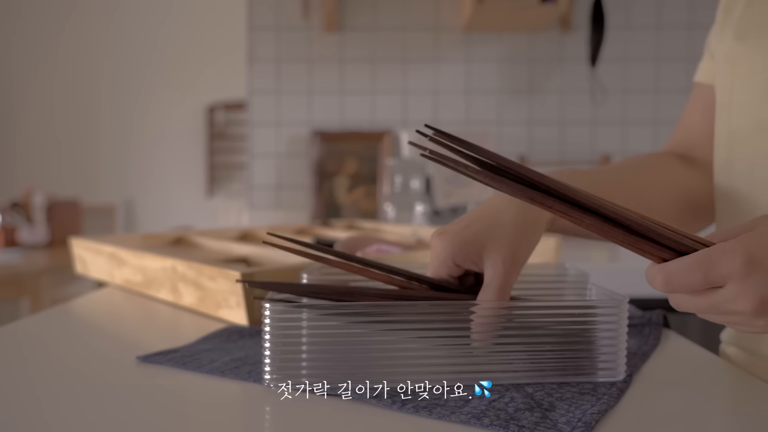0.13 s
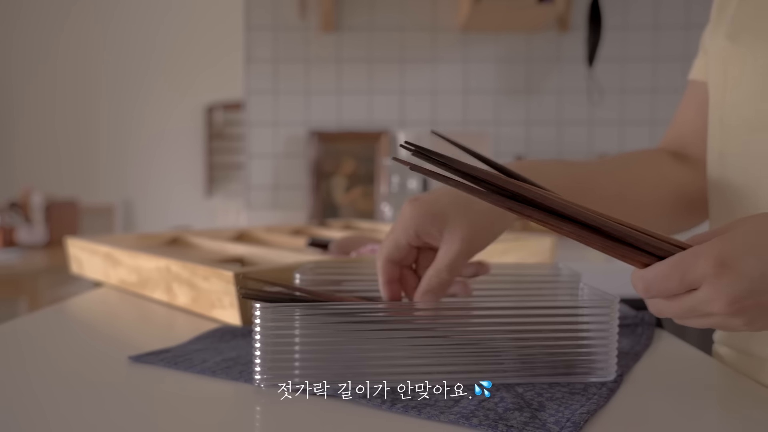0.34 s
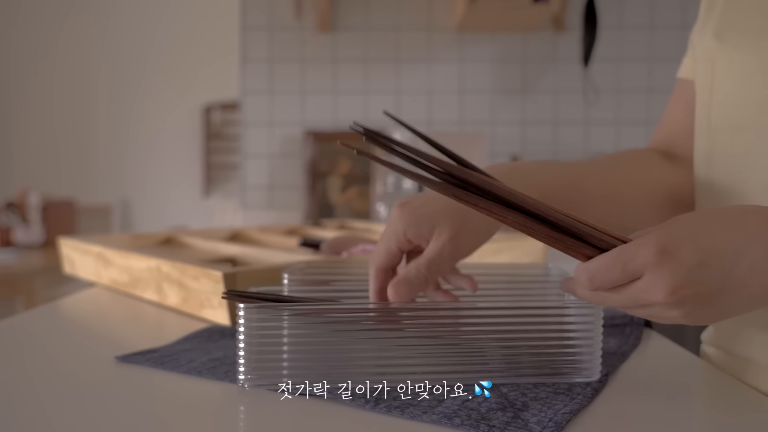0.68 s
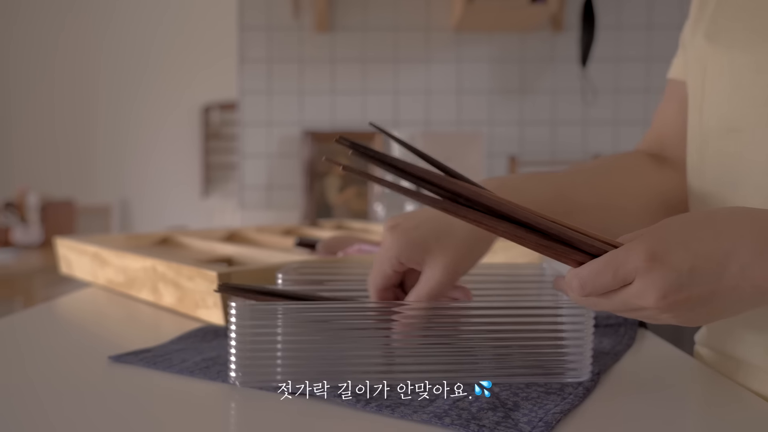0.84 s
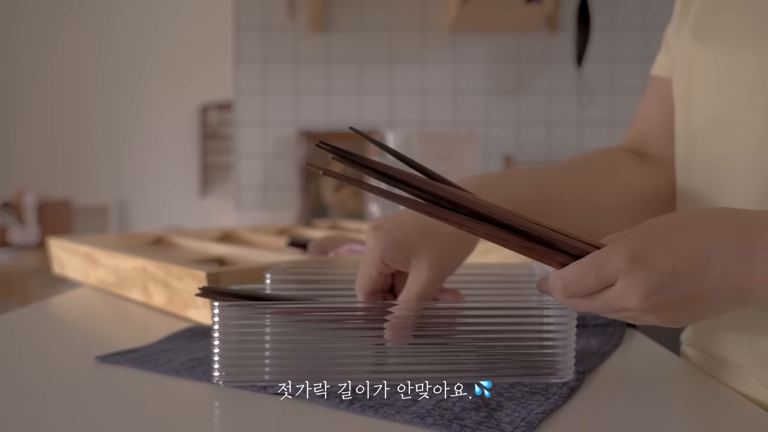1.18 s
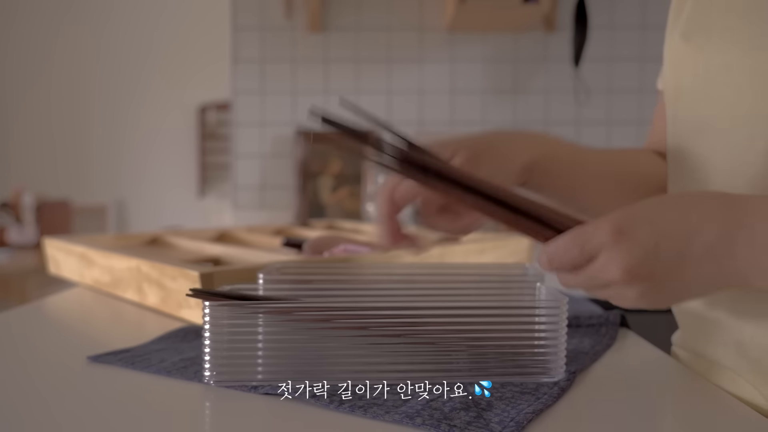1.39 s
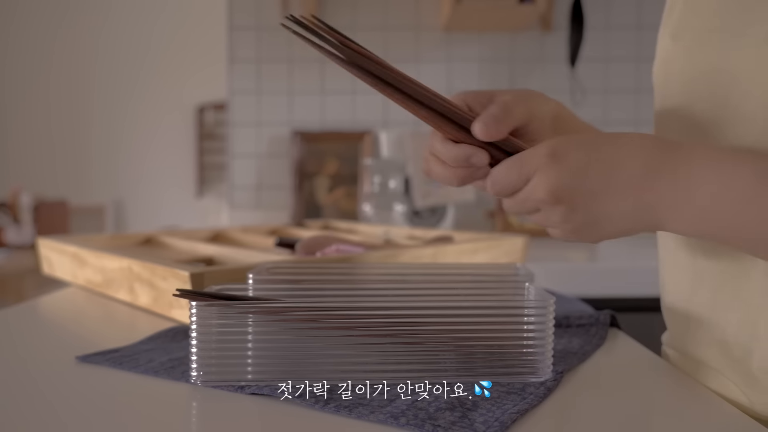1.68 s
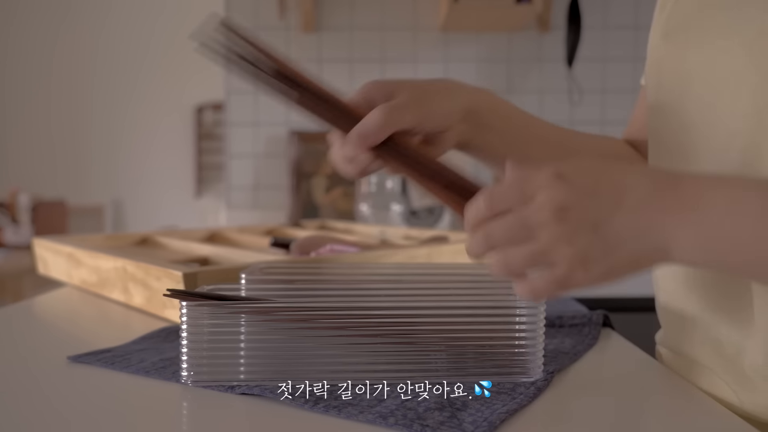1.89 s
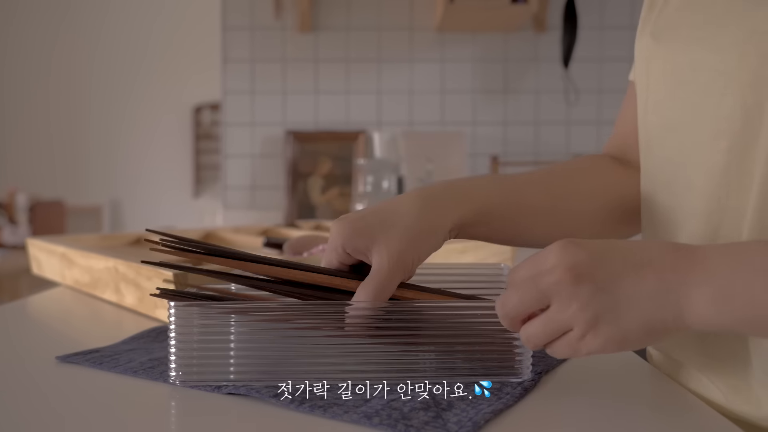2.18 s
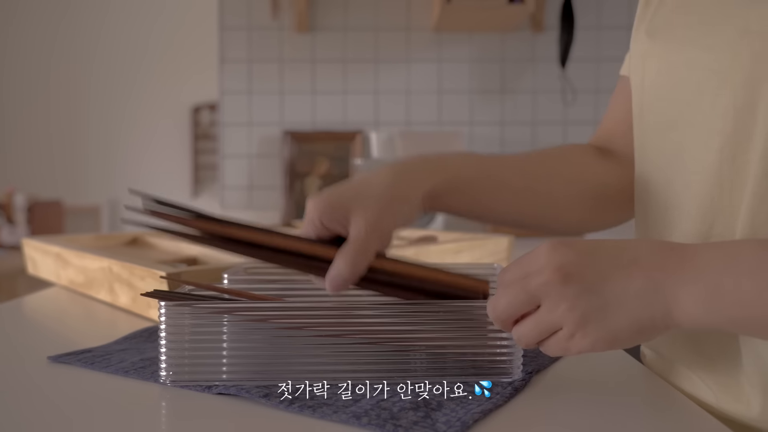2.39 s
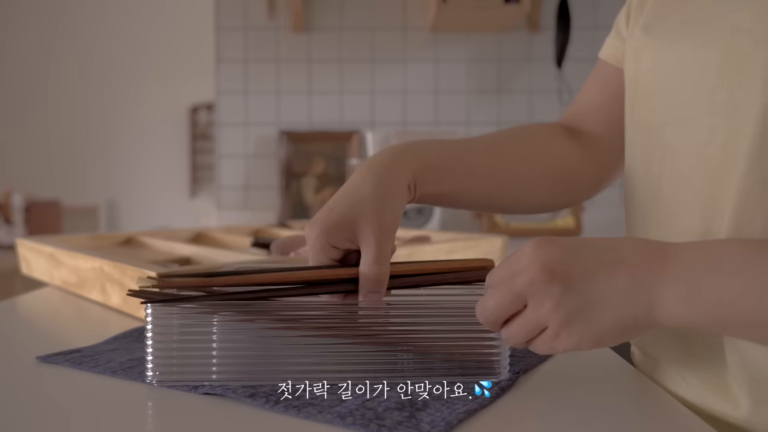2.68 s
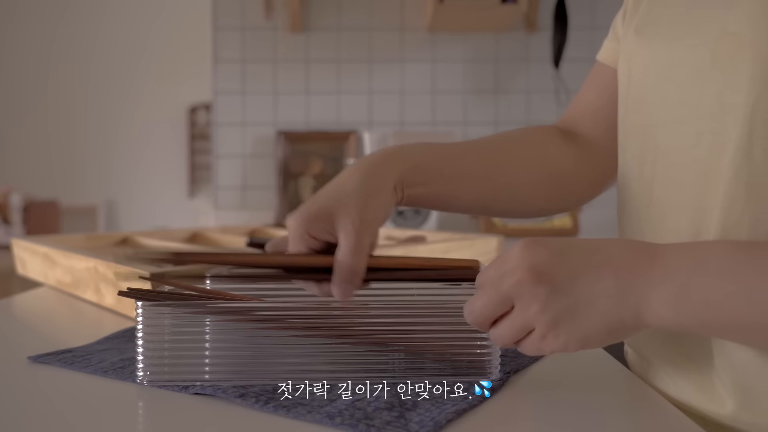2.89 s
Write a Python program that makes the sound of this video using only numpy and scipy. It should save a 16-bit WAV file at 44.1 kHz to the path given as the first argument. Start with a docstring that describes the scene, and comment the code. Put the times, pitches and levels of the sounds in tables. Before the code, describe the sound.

Close by in a quiet kitchen, wooden chopsticks rattle and knock against a plastic container. The clatter eases to a few light stick-on-stick taps, then returns in two bursts as they are laid back.

```python
"""Wooden chopsticks rattle and knock in a ribbed plastic holder, tap together in the hands and are laid back.
Each impact excites damped modes of the hollow holder and the sticks, with a sharp broadband crack;
sliding is a dense train of small impacts. The counter and the tiled kitchen reflect the sound over
a faint rumble and hum, and the loudest blows overload the recorder."""
import sys
import numpy as np
from scipy import signal
from scipy.fft import rfft, irfft, next_fast_len
from scipy.io import wavfile
from scipy.ndimage import uniform_filter1d

SR = 44100
rng = np.random.default_rng(int(sys.argv[2]) if len(sys.argv) > 2 else 0)


def materialize(psi):
    """Save the field psi as 16-bit PCM at rate SR to the path in sys.argv[1].

    A 1-D psi becomes a single channel; in a 2-D psi each row is a channel.
    """
    bounded = np.clip(np.atleast_2d(psi).T, -1, 1)
    quanta = np.round(bounded * 32767).astype(np.int16)
    wavfile.write(sys.argv[1], SR, quanta)


N = 134505
RING_S = .14  # length of one contact's sound


def amp(db):
    """Decibels to amplitude ratio."""
    return 10 ** (np.asarray(db) / 20)


def unit(x):
    """Normalisation to rms 1."""
    return x / np.sqrt(np.mean(x ** 2) + 1e-20)


def along(points, hz):
    """Interpolation on a logarithmic frequency axis."""
    freqs, values = np.transpose(points)
    return np.interp(np.log(hz + 1), np.log(freqs + 1), values)


def filtered(x, response):
    """Zero-phase filtering by a frequency response."""
    n = x.shape[-1]
    size = next_fast_len(n + 2048)
    return irfft(rfft(x, size) * response(np.fft.rfftfreq(size, 1 / SR)), size)[..., :n]


def loudest(x):
    """Greatest rms over 2.5 ms."""
    return np.sqrt(np.abs(uniform_filter1d(x ** 2, size=110, mode="constant")).max() + 1e-20)


def add(out, start_s, x):
    """Superposition of x on out."""
    i = max(0, round(start_s * SR))
    n = min(x.shape[-1], N - i)
    out[:, i:i + n] += x[:, :n]


def pair(noise, correlation):
    """Mid-side mixing of two independent signals sets the left-right correlation."""
    angle = np.arccos(np.clip(correlation, -1, 1)) / 2
    mid, side = np.cos(angle) * noise[0], np.sin(angle) * noise[1]
    return np.array([mid + side, mid - side])


def decay(t, t60):
    """Exponential damping: 60 dB in t60 seconds."""
    return np.exp(-np.log(1000) * t / t60)


def ring(modes, detune=0, scatter_db=2.5):
    """Free vibration: a sum of damped modes of random strength and sign."""
    t = np.arange(int(RING_S * SR)) / SR
    hz, db, t60 = np.transpose(modes)[:, :, None]
    pitch, level, sign = rng.standard_normal((3, len(modes), 1))
    envelope = np.sign(sign) * amp(db + scatter_db * level) * decay(t, t60)
    return np.sum(envelope * np.sin(2 * np.pi * hz * (1 + detune * pitch) * t), axis=0)


def burst(spectrum, t60):
    """A transient of exponentially decaying coloured noise."""
    t = np.arange(int(RING_S * SR)) / SR
    return filtered(rng.standard_normal(len(t)), lambda hz: amp(along(spectrum, hz))) * decay(t, t60)


def radiated(x, cutoff_hz=602):
    """Radiation efficiency: the small holder and thin sticks emit little bass."""
    return signal.sosfilt(signal.butter(2, cutoff_hz, "high", fs=SR, output="sos"), x)


# modes of the plastic holder: (frequency [Hz], level [dB], T60 [s])
HOLDER_MODES = [(912, -27.5, 0.062), (996, -18.5, 0.045), (1083, -12, 0.027), (1202.6, -8.5, 0.057),
                (1339, -16, 0.032), (1372, -19, 0.081), (1434.6, -15.5, 0.049), (1613, -21.5, 0.062),
                (1803, -16.5, 0.021), (2122, -24.5, 0.052)]


def holder(clack_hz, clack_t60=0.02, attack_s=0.00026):
    """Impact excitation: the struck wall clacks briefly and the whole box rings on."""
    t = np.arange(int(RING_S * SR)) / SR
    clack = np.sin(2 * np.pi * clack_hz * t) * decay(t, clack_t60)
    rise = 1 - np.exp(-t / attack_s)
    box = radiated((clack + ring(HOLDER_MODES)) * rise)
    return box / loudest(box)


# bending modes of one stick: (frequency [Hz], level [dB])
STICK_MODES = [(1900, -3.5), (2400, 1.5), (3400, -8.5), (4100, -0.5), (4750, -1), (5900, 8.5), (7000, 5),
               (7700, -1)]
# dry chatter of touching sticks: (frequency [Hz], level [dB])
CHATTER_SPECTRUM = [(300, -13), (2000, -7), (2900, -1), (4200, 1.5), (6500, -3.5), (15000, -40)]
# crack of a contact: (frequency [Hz], level [dB])
CRACK_SPECTRUM = [(100, -7.5), (400, -18), (1000, -34), (3000, -9.5), (7200, 12.5), (9500, 10), (13000, 2),
                  (16000, -16.5)]


def wood(struck_hz, wood_db, crack_db, t60_cycles=110, attack_s=0.0013):
    """Bending vibration with chatter and a crack; equal loss per cycle damps high modes first."""
    modes = [(hz, db, t60_cycles / hz) for hz, db in STICK_MODES]
    bending = sum(ring(modes, detune=0.0566) for stick in range(2))
    # the point of contact favours one mode, slightly different in each of seven touching sticks
    struck = ring([(struck_hz, 0, t60_cycles / struck_hz)] * 7, detune=0.0535)
    chatter = burst(CHATTER_SPECTRUM, t60=.045)
    # a short fade-in softens the start of each click
    rise = 1 - np.exp(-np.arange(len(bending)) / (SR * attack_s))
    sticks = rise * radiated(unit(bending) + amp(-0.5) * (unit(struck) + unit(chatter)))
    crack = rise * burst(CRACK_SPECTRUM, t60=0.013)
    treble = filtered(crack, lambda hz: hz > 9000)  # crack_db refers to this band
    return amp(wood_db) * sticks / loudest(sticks) + amp(crack_db) * crack / loudest(treble)


def rattle(length_s, voice, sticks=4, contacts_per_s=640, scatter_db=1.5):
    """Convolution: random impulse trains, swelling and fading, each excite one voice()."""
    n = max(64, int(length_s * SR))
    count = max(2, int(contacts_per_s * length_s / sticks))
    stroke = 0
    for stick in range(sticks):
        when, size = rng.random(200), rng.standard_normal(200)
        force = np.sign(size) * amp(scatter_db * size) * np.sqrt(np.sin(np.pi * when))
        impulses = np.bincount((when[:count] * n).astype(int), force[:count], n)
        stroke = stroke + signal.fftconvolve(impulses, voice())
    return stroke / np.sqrt(np.sum(stroke ** 2) / n)


# strokes in the holder: (time [s], duration [s], holder level [dB], wood level [dB], crack level [dB])
SLIDE_STROKES = [(0, 0.092, -31.5, -42, -55), (0.301, .07, -21, -38, -63), (0.386, .18, -15.5, -23, -36),
                 (0.573, 0.091, -39, -37, -57), (0.921, 0.05, -26.5, -34, -51),
                 (1.053, 0.07, -23, -33, -43), (1.146, .065, -19.5, -29.5, -49),
                 (1.239, .055, -23.5, -35.5, -51), (1.445, 0.018, -26, -46, -76),
                 (2.245, 0.054, -21.5, -33, -40.5), (2.466, .048, -20.5, -23.5, -45),
                 (2.611, 0.047, -28.5, -57, -68), (2.68, 0.081, -31, -29, -45),
                 (2.751, .1, -17.5, -25.5, -36), (2.81, 0.079, -23, -28, -41)]


def slides(clack_hz=1180, stick_hz=4558, trim_db=-3):
    """Roughness excitation: sticks skid over the ribs and roll over each other."""
    out = np.zeros((2, N))
    for start, length, holder_db, wood_db, crack_db in SLIDE_STROKES:
        box = rattle(length, lambda: holder(clack_hz * (1 + rng.normal(0, 0.088))))
        sticks = rattle(length, lambda: wood(stick_hz * rng.lognormal(0, 0.1894), wood_db, crack_db))
        add(out, start, kitchen([amp(holder_db + trim_db) * box, amp(wood_db + trim_db) * sticks]))
    return out


# impacts in the holder: (time [s], clack frequency [Hz], stick frequency [Hz],
# holder level [dB], wood level [dB], crack level [dB])
HOLDER_IMPACTS = [(0.001, 1362, 5580, -25, -24.5, -39), (0.099, 1360, 6000, -26.5, -32, -32),
                  (0.168, 1074, 4470, -24.5, -40, -65), (0.256, 1275, 3724, -14.5, -18.5, -38),
                  (0.272, 1270, 4810, -11, -21.5, -45.5), (0.299, 1150, 5770, -13.5, -15.5, -26.5),
                  (0.364, 1092, 5500, -13, -21, -35), (0.388, 1120, 3770, -9, -26, -29.5),
                  (0.394, 1156, 6880, -22.5, -11, -25.5), (0.415, 1110, 6600, -9, -18.5, -34.5),
                  (0.44, 1122, 4290, -12.5, -15, -40), (0.4546, 1196, 4950, -15, -18.5, -30),
                  (0.470, 1200, 6930, -13.5, -24, -24), (0.477, 1150, 6800, -23.5, -23.5, -37),
                  (0.486, 1207, 5000, -18.5, -15, -25.5), (0.513, 1327, 7600, -16, -15, -26.5),
                  (0.527, 1320, 4510, -10, -18, -31.5), (0.544, 1280, 4280, -11.5, -22.5, -41),
                  (0.5669, 1360, 4590, -5.5, -19.5, -33.5), (0.703, 1150, 3700, -13, -18, -34),
                  (0.727, 1110, 3970, -17, -42, -51), (0.845, 1303, 5690, -14.5, -18, -33),
                  (0.849, 1275, 4370, -8.5, -24, -31), (0.94, 1100, 4580, -15.5, -32.5, -55),
                  (1.005, 1142, 4090, -19.5, -33.5, -53), (1.049, 1226, 4810, -8, -19.5, -40),
                  (1.062, 1147, 4070, -22.5, -18.5, -36.5), (1.297, 1273, 4330, -12, -24, -43.5),
                  (1.361, 1150, 4300, -20.5, -43, -62.5), (1.509, 1180, 4130, -23, -30.5, -48),
                  (1.516, 1082, 6900, -15.5, -17, -33), (2.202, 1160, 4300, -14.5, -18, -30.5),
                  (2.236, 1305, 3510, -8, -21, -34.5), (2.242, 1200, 3980, -14.5, -15.5, -35),
                  (2.254, 1350, 3460, -13, -17, -42), (2.334, 1366, 3810, -6.5, -18.5, -44.5),
                  (2.467, 1180, 4130, -14.5, -21, -54), (2.474, 1380, 4050, -20, -16.5, -27.5),
                  (2.666, 1308, 4720, -11, -20, -33), (2.674, 1030, 5000, -9, -15.5, -30),
                  (2.687, 1144, 5570, -10, -18, -40), (2.701, 1354, 3120, -7, -18, -34),
                  (2.712, 1260, 4560, -16, -15.5, -23), (2.717, 1144, 5520, -8.5, -15.5, -23.5),
                  (2.73, 1284, 5950, -15.5, -21.5, -22), (2.751, 1280, 6040, -13.5, -14.5, -32.5),
                  (2.761, 1280, 3790, -18, -19, -29), (2.777, 1173, 6000, -13.5, -18, -35),
                  (2.787, 1137, 6050, -16.5, -22, -31), (2.802, 1250, 3900, -11.5, -21, -35)]


def knocks():
    """Collision excites both bodies: holder and sticks ring together."""
    out = np.zeros((2, N))
    for start, clack_hz, stick_hz, holder_db, wood_db, crack_db in HOLDER_IMPACTS:
        add(out, start, kitchen([amp(holder_db) * holder(clack_hz), wood(stick_hz, wood_db, crack_db)]))
    return out


# reverberation time: (frequency [Hz], T60 [s])
REVERB_T60 = [(200, 0.85), (1200, 0.57), (3500, 0.51), (7500, 0.6), (14000, 0.2)]
# colour of the diffuse tail: (frequency [Hz], level [dB])
REVERB_SPECTRUM = [(200, 4.5), (1200, -6.5), (3000, 1), (7000, -4.5), (14000, 2)]
# left-right likeness of the echoes: (frequency [Hz], correlation [1])
REVERB_CORRELATION = [(500, 0.78), (1200, 0.97), (2200, 0.43), (4000, 0.02), (8000, 0.046), (15000, -0.38)]


def kitchen(parts, echo_db=0, tail_s=.6, early_s=.024, reflections=14, pan_db=2):
    """Room impulse response, new for each place of contact: direct sound, early echoes, diffuse tail."""
    n = int(tail_s * SR)
    hz, t, bands = signal.stft(rng.standard_normal((2, n)), SR, nperseg=256)
    t60 = along(REVERB_T60, hz)[:, None]
    equal_energy = np.sqrt(2 * np.log(1000) / (t60 * SR))
    bands = bands * amp(along(REVERB_SPECTRUM, hz)[:, None]) * decay(t, t60) * equal_energy
    fade_in = np.minimum(1, np.arange(n) / (0.002 * SR))
    echoes = signal.istft(bands, SR, nperseg=256)[1][:, :n] * fade_in
    for channel in echoes:  # early echoes from the counter and nearby things
        delay = rng.uniform(.0005, early_s, reflections)
        gain = rng.standard_normal(reflections) * np.exp(-delay / early_s)
        channel += np.bincount((delay * SR).astype(int), amp(-3) * gain / np.linalg.norm(gain), n)
    correlation = along(REVERB_CORRELATION, np.fft.rfftfreq(n, 1 / SR))
    response = amp(echo_db) * irfft(pair(rfft(echoes), correlation), n)
    response[:, 0] += amp(np.array([.5, -.5]) * pan_db * rng.standard_normal())  # direct sound
    # scale each part to keep about the same peak level in the room
    onset = response.mean(axis=0)[:SR // 20]
    source = sum(part * loudest(part) / loudest(signal.fftconvolve(part, onset)) for part in parts)
    return signal.fftconvolve(source[None], response, axes=1)


# background noise: (frequency [Hz], relative spectral density [dB])
AMBIENT_SPECTRUM = [(25, -5.5), (60, 8.5), (110, 1), (300, -7.5), (1000, -10.5), (4000, -23.5)]


def room_tone(noise_db=-51, hum_hz=59.4, hum_db=-75):
    """Stationary background: faint rumble and hiss with a low pure tone."""
    white = pair(rng.standard_normal((2, N)), correlation=0.062)
    noise = filtered(white, lambda hz: amp(along(AMBIENT_SPECTRUM, hz)))
    hum = np.sin(2 * np.pi * hum_hz * np.arange(N) / SR)
    return amp(noise_db) * unit(noise) + amp(hum_db) * unit(hum)


# modes of the gripped bundle, tapped at its ends: (frequency [Hz], level [dB], T60 [s])
BUNDLE_MODES = [(1100, -7, .008), (2050, -1, .014), (2420, 1, .018), (7700, 1, .012)]
# stick on stick in the hands: (time [s], wood level [dB], crack level [dB])
HAND_TAPS = [(0.329, -31, -54), (1.611, -37, -46), (1.639, -27.5, -37), (1.65, -28.5, -35.5),
             (1.758, -24.5, -27), (1.765, -23.5, -33), (1.854, -21, -28.5), (1.86, -25, -30),
             (1.875, -36, -37), (2.129, -46, -68)]


def ticks(stick_hz=5753):
    """Heavily damped vibration: gripped sticks tap together, clear of the holder."""
    out = np.zeros((2, N))
    for start, wood_db, crack_db in HAND_TAPS:
        bundle = ring(BUNDLE_MODES)
        sticks = wood(stick_hz, wood_db, crack_db)
        add(out, start, kitchen([sticks, amp(wood_db - 3) * bundle / loudest(bundle)], echo_db=-3.5))
    return out


# modes of the holder's long wall: (frequency [Hz], level [dB], T60 [s])
WALL_MODES = [(755, -2, 0.22), (1224, 1.5, 0.24)]
# square blows on that wall: (time [s], level [dB])
WALL_IMPACTS = [(1.054, -21), (1.078, -24.5), (1.3, -30)]


def long_wall():
    """Plate resonance: struck squarely, the long wall rings with two clear notes."""
    out = np.zeros((2, N))
    for start, db in WALL_IMPACTS:
        notes = ring(WALL_MODES)
        add(out, start, kitchen([amp(db) * notes / loudest(notes)]))
    return out


def scene():
    """Superposition of all the handling and the quiet kitchen."""
    return knocks() + long_wall() + ticks() + slides() + room_tone()


def record(dry):
    """Saturation rounds off the loudest peaks; a low-pass limits the bandwidth."""
    ceiling, top_hz = 1.02, 15800
    clipped = dry / (1 + np.abs(dry / ceiling) ** 6) ** (1 / 6)
    return filtered(clipped, lambda hz: hz < top_hz)


dry = scene()
out = record(dry)
materialize(out)
```